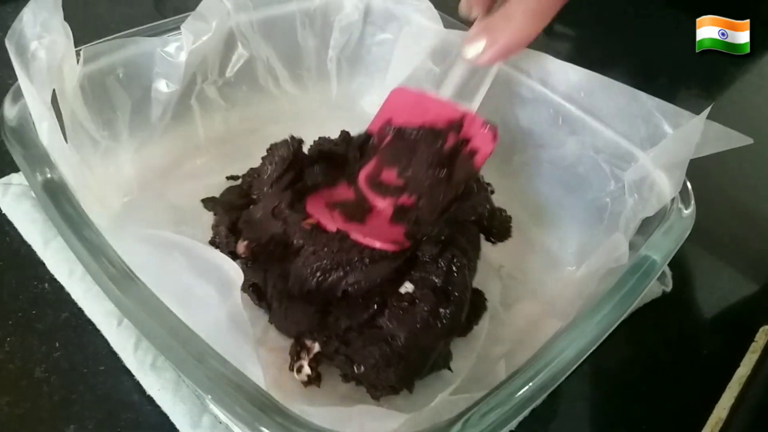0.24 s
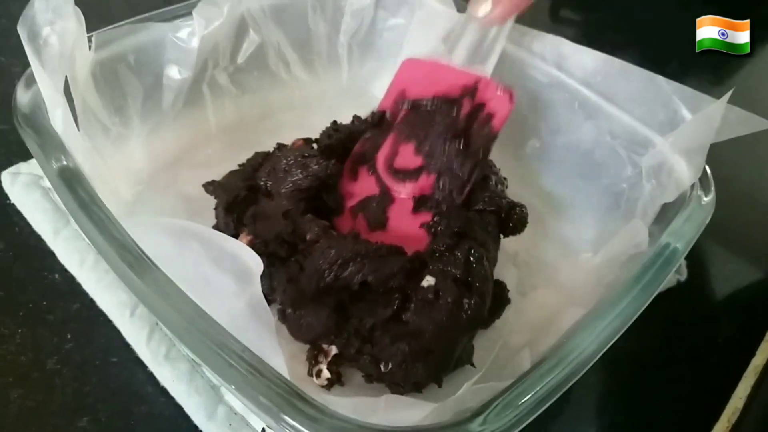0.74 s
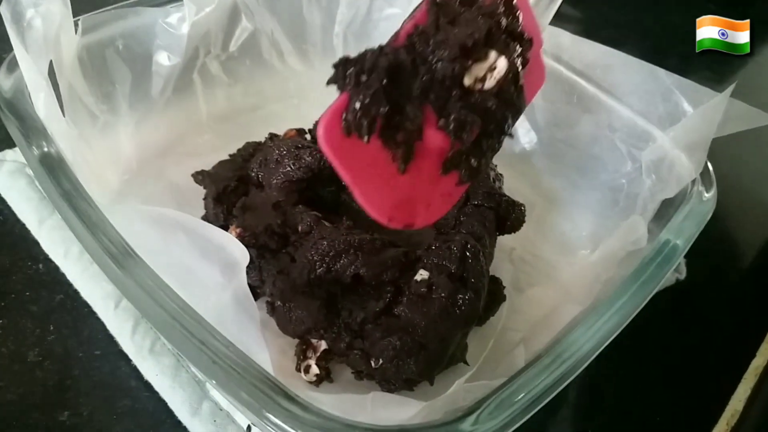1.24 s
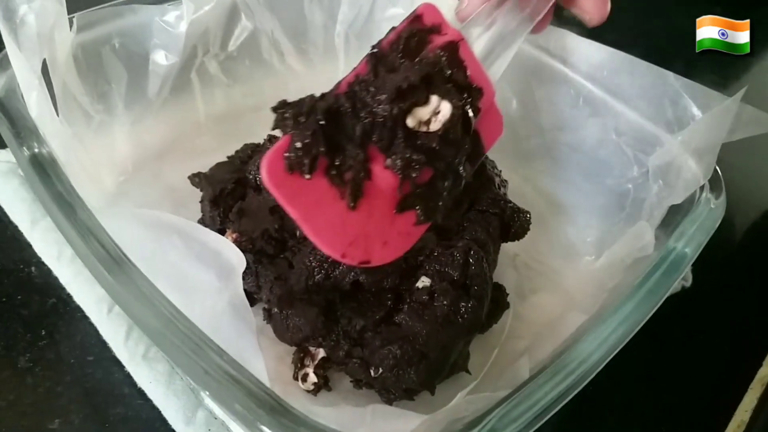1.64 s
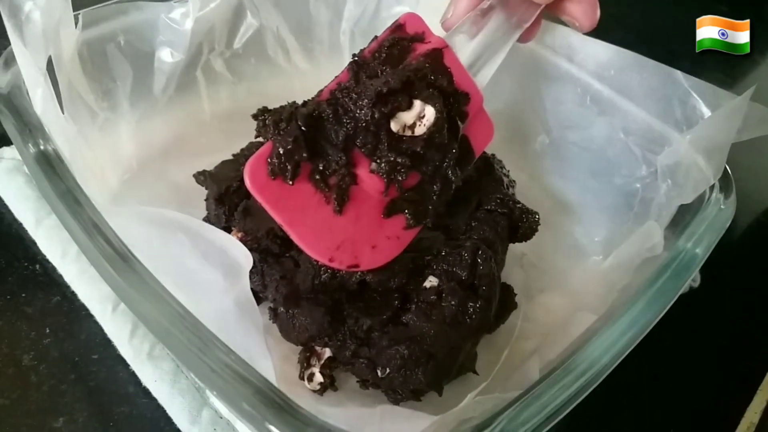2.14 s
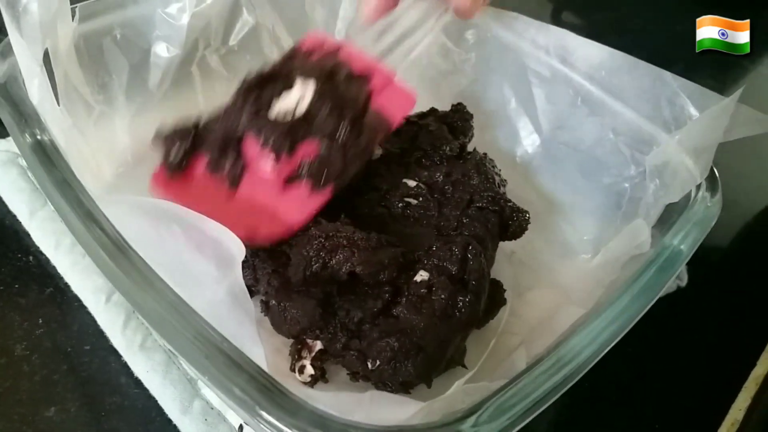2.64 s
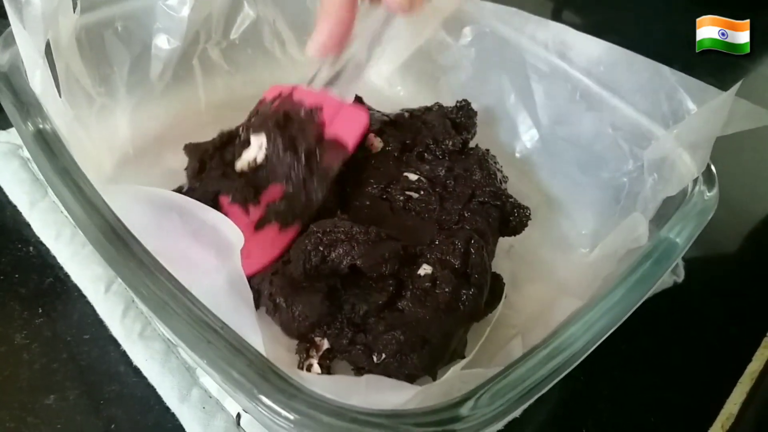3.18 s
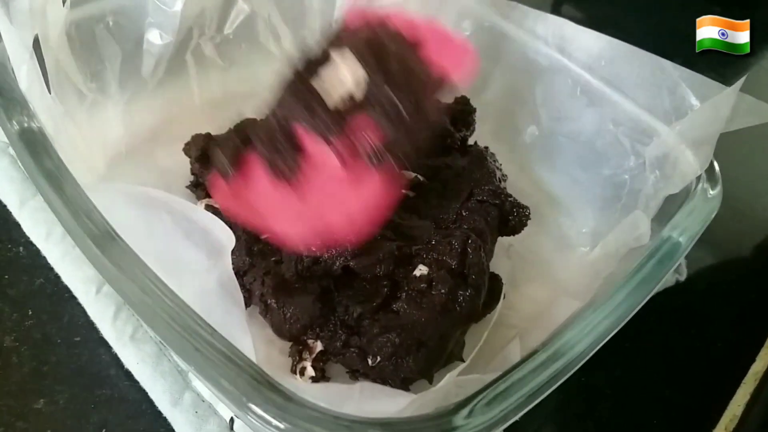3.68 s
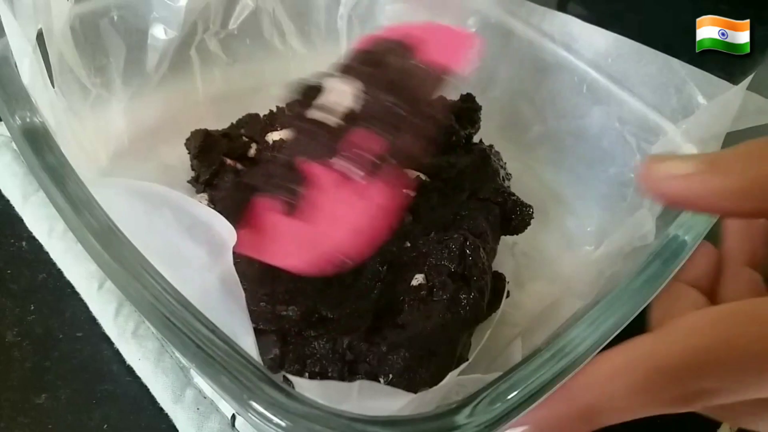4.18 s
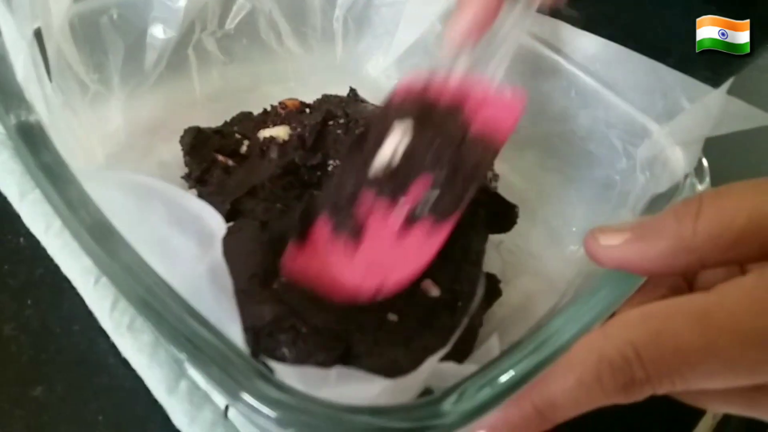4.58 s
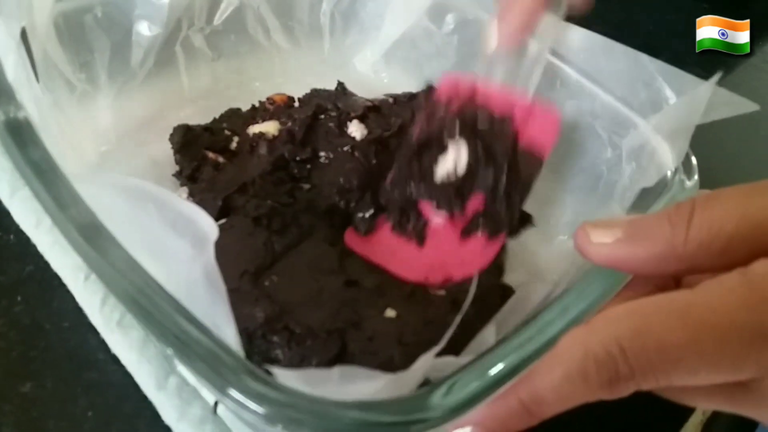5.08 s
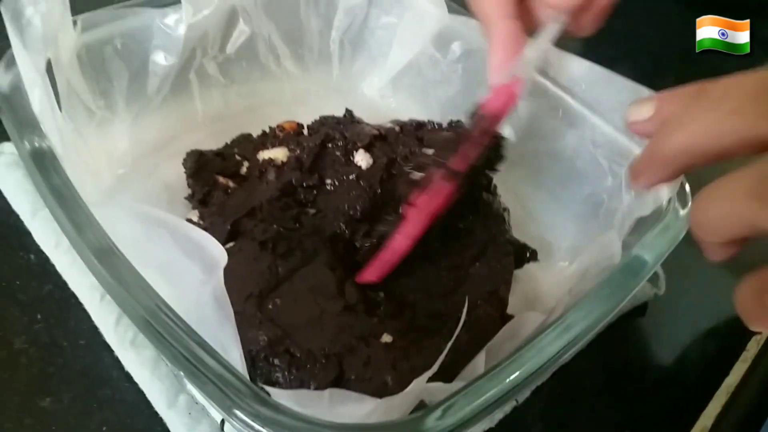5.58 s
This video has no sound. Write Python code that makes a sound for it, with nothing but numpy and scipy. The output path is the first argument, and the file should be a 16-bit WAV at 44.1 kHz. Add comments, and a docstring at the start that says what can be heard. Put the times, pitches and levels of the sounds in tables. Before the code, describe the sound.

Faint sticky smears of thick fudge with tiny high clicks, a hard glass dish knock, then sharp pops and crackles of lining paper.

```python
"""A spatula smears thick fudge with a sticky fizz, in a paper-lined glass dish in a hard-walled kitchen.
Filtered streams of tiny bursts make the smear; sticky threads part in high clicks, and the lining paper
snaps in short pops with noise cracks. Knocks excite the dish's short low modes and ringing glass, and soft
bumps follow. Dry ticks, a low wavering drone and filtered room noise lie under it. One microphone hears
it all, and the paper, dish and fudge sounds carry the echo of the room."""
import sys
import numpy as np
from scipy import signal
from scipy.fft import rfft, irfft, next_fast_len
from scipy.io import wavfile
from scipy.ndimage import uniform_filter1d

SR = 44100
rng = np.random.default_rng(int(sys.argv[2]) if len(sys.argv) > 2 else 0)


def waveform_to_disk(signal):
    """Save audio, clipped to [-1, 1], as 16-bit WAV at the path in sys.argv[1]."""
    frames = np.transpose(np.atleast_2d(signal))
    scaled = np.clip(frames, -1, 1) * 32767
    samples = np.round(scaled).astype(np.int16)
    wavfile.write(sys.argv[1], SR, samples)


N = 256662  # samples
TIME = np.arange(N) / SR  # seconds


# Pushes of the blade through the fudge.
# Each row: start in seconds, length in seconds, drag in dB before the common trim, wet fizz in dB.
STROKES = [(0.107, 0.33, -73, -76.5), (0.417, 0.074, -74, -63), (0.515, 0.16, -79, -66.5),
           (0.851, 0.048, -73, -64), (1.181, .08, -72.5, -80), (2.787, 0.083, -60, -64.5),
           (2.97, 0.089, -61, -76), (3.074, 0.051, -57.5, -61), (3.193, 0.12, -75, -69.5),
           (3.387, 0.14, -72, -72.5), (3.566, 0.23, -73, -78), (3.743, 0.23, -66.5, -69),
           (4.044, .12, -72, -65.5), (4.165, 0.053, -64, -73), (4.42, 0.11, -69.5, -73.5),
           (4.561, 0.075, -66.5, -60.5)]
# Hollows between blade and dish that colour the scraping.
# Each row: centre in Hz, width in Hz, level in dB against the plain slips.
HOLLOWS = [(356, 24, 15), (710, 130, 3), (1325, 130, 2), (2320, 400, 5), (4180, 730, -4)]
# Tone curve of the dragging blade. Each row: frequency in Hz, relative level in dB.
DRAG_TONE = [(150, 7), (400, -11), (900, -2.5), (1600, -4.5), (2500, -4), (3200, -4.5), (4400, -8.5),
             (5600, -10.5), (9000, -24.5)]
# Tone curve of the wet fizz. Each row: frequency in Hz, relative level in dB.
FIZZ_TONE = [(1500, -3), (4000, 1), (7000, -4), (9200, 4), (11500, 2.5), (14000, 5), (16000, -44)]
STROKE_BUILD_SHARE, STROKE_RELEASE_S = 0.59, 0.029


def smearing(drag_db=-1, fizz_db=0, sticking_db=0.83, sticking_hz=35):
    """The blade drags in fine slips, and sticky threads and air pockets burst behind it."""
    drag_level, fizz_level = np.zeros(N), np.zeros(N)
    for start, length, stroke_drag_db, stroke_fizz_db in STROKES:
        effort = push(start, length, STROKE_BUILD_SHARE, STROKE_RELEASE_S)
        drag_level = np.maximum(drag_level, effort * undb(stroke_drag_db + drag_db))
        fizz_level = np.maximum(fizz_level, effort * undb(stroke_fizz_db + fizz_db))
    slips = crackle(30000, spread_db=0.83, flutter_db=2.6, flutter_hz=90)
    hollow_sound = sum(undb(db) * resonate(slips, hz, width) for hz, width, db in HOLLOWS)
    drag = colour(slips + hollow_sound, DRAG_TONE) * drag_level
    bursts = crackle(9000, spread_db=3.1, flutter_db=2.0, flutter_hz=140)
    fizz = colour(bursts, FIZZ_TONE) * fizz_level
    sticking = undb(sticking_db * walk(sticking_hz))
    return room((drag + fizz) * sticking, wet_db=-6)


# The thickest sticky threads parting. Each row: start in seconds, level in dB, pitch in Hz.
THREADS = [(.161, -46, 12500), (.222, -47, 11870), (.4465, -29, 12900), (.551, -40, 12100),
           (.6435, -46.5, 11000), (3.052, -50, 8900), (3.457, -50, 10000), (4.031, -47, 10200),
           (4.128, -39.5, 11500), (4.137, -39, 12500), (4.579, -37, 11700), (4.629, -44, 13000)]


def threads(cycles=0.82, length_s=.003, count=3):
    """Each thread of fudge lets go in a few tiny, high clicks."""
    out, t = np.zeros(N), TIME[:SR // 100]
    for s, db, hz in list(THREADS) + fine_threads():
        for k, (when, detune) in enumerate(rng.random((count, 2))):
            delay = (k > 0) * when * length_s  # the first click is on time
            click = pop(t, hz * 2 ** (0.32 * (detune - .5)), cycles)
            add(out, s + delay, undb(db - 4.7 * k) * click)
    return room(out, wet_db=-14)


# Finer threads part at random while the blade moves; the level spread goes both ways
FINE_THREADS_PER_S, FINE_THREAD_DB, FINE_THREAD_SPREAD_DB, FINE_THREAD_HZ = 12, -57.5, 6.5, 10000


def fine_threads():
    """Fine threads part only during strokes: rows of seconds, dB, Hz."""
    rows = []
    for when, size, detune in rng.random((int(FINE_THREADS_PER_S * N / SR), 3)):
        s = when * N / SR
        if any(0 < s - start < length for start, length, _, _ in STROKES):
            db = FINE_THREAD_DB + FINE_THREAD_SPREAD_DB * (2 * size - 1)
            rows.append((s, db, FINE_THREAD_HZ * 2 ** (.5 * (detune - .5))))
    return rows


# Snaps of the lining paper. Each row: start in seconds, level in dB, pitch in Hz, crumple length in ms,
# crisp treble in dB and low thud in dB, both against the snap's level (the treble before crack_db).
SNAPS = [(0.4036, -48.5, 2750, 1.4, -3, -11), (0.434, -49, 3550, 5.9, -14, -1),
         (0.4467, -35.5, 3520, 2.3, 1, -33), (.4475, -38.5, 950, 5.54, -7, 1.5),
         (.569, -48, 1270, 4.2, -4, 5), (.641, -44.5, 2020, 2.5, 3.5, -11),
         (.750, -50.5, 1220, 2.2, -16, -17), (1.214, -56, 2550, 4.5, 10.5, -3),
         (1.266, -56.5, 2440, 4.2, 4.5, -25), (1.914, -53, 1870, 16.7, -15, 0.5),
         (2.861, -47.5, 1226, 5.4, -1, 4), (3.131, -43.5, 1340, 6.3, 1.5, 4.5),
         (3.306, -57.5, 2860, 3, 7.5, 2), (4.116, -48, 3040, 1, -14, -10),
         (4.184, -38.5, 2130, 3.2, -16, -10.5), (4.519, -50.5, 2080, 5, -5, -22),
         (4.854, -36.5, 1210, 3.2, -4, 1.5), (4.861, -32.5, 760, 12, -15, -33),
         (4.865, -32, 2210, 5, -5, -5), (4.951, -39, 1276, 2.6, 1, -1), (4.9633, -39, 1480, 6.9, 2.5, -0.5),
         (5.0185, -35, 1880, 4, -3, -17), (5.021, -32, 1830, 5, -8, -11),
         (5.036, -28, 1830, 8.5, -5.5, -20), (5.061, -14, 1310, 1.2, -9.5, -44),
         (5.1448, -19.5, 1890, 2.74, -4, -25), (5.156, -31.5, 1460, 3.5, -0.5, -34),
         (5.1595, -28.5, 787, 1.94, -27, 0), (5.207, -41.5, 1760, 9, 0, -3),
         (5.2156, -39, 854, 8.37, 0, -15), (5.275, -35, 2260, 3.7, -30, -6),
         (5.331, -50.5, 1400, 7.5, 8, -12), (5.369, -46, 2163, 5.1, -13, -31),
         (5.3732, -33, 2260, 4, -16, -39), (5.3831, -33, 1790, 2.8, -8, -14.5),
         (5.4423, -32, 1530, 1.34, -17, -37), (5.4717, -35, 3450, 1.3, -11, -22),
         (5.518, -41.5, 1820, 0.56, -28, -14), (5.529, -40.5, 1380, 1.2, -10, -32),
         (5.7213, -52.5, 1560, 4.4, -3, -3), (5.735, -52.5, 1410, 2.9, 10, 6)]
# Tone curve of a hard, crisp crack. Each row: frequency in Hz, relative level in dB.
CRISP_TONE = [(600, 3), (2000, 1), (3500, 9), (5000, -1.5), (6800, -9), (8500, 0), (11000, -2.5),
              (14000, -21)]


def snaps(cycles=0.79, crack_s=.0015, crack_db=-7, thud_hz=480, thud_cycles=0.22, follow_db=-7,
          low_cut_hz=110, count=8):
    """Each buckle of the paper is a pop and a crack, trailed by smaller folds of scattered pitch."""
    out, t = np.zeros(N), TIME[:SR // 20]
    for s, db, hz, length_ms, crisp_db, thud_db in SNAPS:
        length = length_ms / 1000
        sound = pop(t, hz, cycles) + undb(thud_db) * pop(t, thud_hz, thud_cycles)
        # a short buckle is nearly one clean pop; a longer crumple folds more strongly after it
        crumple = min(length / 0.0048, 1) ** 2
        for when, detune, size in rng.random((count, 3)):
            fold = pop(t, hz * 2 ** (1.7 * (detune - .5)), cycles)
            add(sound, when * length, undb(follow_db) * (.5 + size) * crumple * fold)
        crack_fade = np.exp(-t / (crack_s + 0.37 * length))
        crack = colour(rng.standard_normal(len(t)), CRISP_TONE) * crack_fade
        add(out, s, undb(db) * (sound + undb(crisp_db + crack_db) * crack))
    # the snaps carry little deep bass
    low_cut = signal.butter(2, low_cut_hz, "high", fs=SR, output="sos")
    return room(signal.sosfilt(low_cut, out), wet_db=-0.5)


# The hand grips and shifts the lining paper. Each row: start in seconds, length in seconds, level in dB.
GRIPS = [(4.848, 0.024, -53), (5.001, 0.07, -51), (5.108, 0.12, -58.5), (5.344, 0.13, -59.5),
         (5.71, .03, -66)]
# Tone curve of the creasing paper. Each row: frequency in Hz, relative level in dB.
PAPER_TONE = [(200, -37), (700, 3), (1500, 2), (3500, 2.5), (6500, -13), (9500, -3), (14000, -3.5)]
GRIP_BUILD_SHARE, GRIP_RELEASE_S = 0.25, 0.031


def rustle(spread_db=4):
    """Fine creases crackle between the big snaps while the hand holds the paper."""
    creases = colour(crackle(2200, spread_db, flutter_db=4.1, flutter_hz=110), PAPER_TONE)
    grip = sum(undb(db) * push(start, length, GRIP_BUILD_SHARE, GRIP_RELEASE_S)
               for start, length, db in GRIPS)
    return room(creases * grip, wet_db=-1)


# Knocks and touches on the dish; the faint row 12 ms after the first knock is that knock's echo off a near
# wall. # Each row: start in seconds, relative level in dB, contact brightness in Hz, glass ring in dB against
# that level.
KNOCKS = [(2.2347, 4.5, 2360, -7.5), (2.2465, -14, 1980, -23), (2.2872, -15, 2800, -20),
          (2.2888, -0.5, 1690, -12), (2.3145, -6, 2180, -26), (2.3264, -4.5, 1120, -11.5),
          (2.384, -9.5, 1450, -40), (2.464, -28, 5000, -1), (3.57, -42, 500, 5)]
# The dish on its counter. Each row: mode in Hz, width in Hz, relative level in dB.
BODY = [(214, 145, -15.5), (346, 56, -4.5), (395, 57, -3), (640, 180, 0.5), (736, 40, 6.5), (772, 42, 2.5),
        (853.5, 27, 6.5), (902, 40, 4.5), (1240, 194, -3.5), (1363, 190, -0.5), (1730, 370, -5)]
# Ringing of the glass. Each row: mode in Hz, relative level in dB, time to fall 60 dB in seconds.
GLASS = [(784, -4, 1), (820, -12, 0.74), (4486, -11, 0.6), (4515, -10.5, 0.28), (7470, -7.5, 0.093),
         (7540, -18, 0.24), (8500, -9.5, 0.13), (10040, -17, .24), (11670, -9, 0.13), (12060, -15, .26)]


def knock(body_db=10, glass_db=-38, click_db=-22, crack_db=-44, crack_s=0.0011):
    """The dish is knocked and rattles: short low modes fill the room while the glass rings on."""
    blows, strikes, t = np.zeros(N), np.zeros(N), TIME[:SR]
    for s, db, hz, ring_db in KNOCKS:
        contact = t * np.exp(-2 * np.pi * hz * t)  # softer contact, longer push
        add(blows, s, undb(db) * contact / contact.sum())
        add(strikes, s, undb([db + ring_db]))  # a single-sample impulse
    body = np.zeros(N)
    for k, (hz, width, db) in enumerate(BODY):
        body += (-1) ** k * undb(db) * resonate(blows, hz, width)
    ring = sum(undb(db - 60 * t / t60) * np.sin(2 * np.pi * hz * t) for hz, db, t60 in GLASS)
    # the hard contact cracks, and the rim chatters faintly after it
    crack_fade = np.exp(-t / crack_s) + undb(-20) * np.exp(-t / 0.13)
    crack = colour(rng.standard_normal(len(t)), CRISP_TONE) * crack_fade
    glass_response = undb(glass_db) * ring + undb(crack_db) * crack
    glass = signal.fftconvolve(strikes, glass_response)[:N]
    click = undb(click_db) * resonate(blows, 1500, 3300)
    return room(undb(body_db) * (body + click), wet_db=6.5) + room(glass, wet_db=2.0)


# Soft bumps. Each row: start in seconds, level in dB, pitch in Hz.
BUMPS = [(3.49, -49, 390), (3.499, -38.5, 247), (3.514, -53, 522), (3.528, -59, 870), (3.533, -42.5, 314),
         (3.554, -61, 250)]


def bumps(cycles=0.99, tap_db=-14, tap_hz=560):
    """Dull, padded bumps as the spatula comes away: a low pop with a fainter tap on it."""
    out, t = np.zeros(N), TIME[:SR // 8]
    for s, db, hz in BUMPS:
        tap = undb(tap_db) * pop(t, tap_hz, 0.42)
        add(out, s, undb(db) * (pop(t, hz, cycles) + tap))
    return room(out, wet_db=4)


# Runs of faint, evenly spaced dry ticks.
# Each row: start in seconds, length in seconds, first tick in dB, last tick in dB, before random scatter.
TICK_RUNS = [(0.6043, .185, -50, -37.5), (4.301, .185, -41, -52.5), (5.534, .12, -40.5, -47)]
TICK_GAP_S = .0335


def ticks(hz=2500, cycles=0.25, edge_hz=4900, scatter_db=-1.0):
    """Runs of tiny low-passed clicks with no echo; each run grows or fades."""
    out, t = np.zeros(N), TIME[:SR // 200]
    for start, length, first_db, last_db in TICK_RUNS:
        times = start + np.arange(0, length, TICK_GAP_S)
        for s, db in zip(times, np.linspace(first_db, last_db, len(times))):
            level = undb(db + scatter_db * rng.standard_normal())
            add(out, s, level * pop(t, hz, cycles))
    return signal.sosfilt(signal.butter(8, edge_hz, fs=SR, output="sos"), out)


# Swells of a faint low drone.
# Each row: loudest moment in seconds, half width in seconds, pitch at that moment in Hz, level in dB.
SWELLS = [(0.381, 0.11, 341.4, -71), (.8, 0.17, 345, -68.5), (1.76, 0.12, 322.6, -71.5),
          (4.18, 0.095, 368, -61), (4.75, 0.14, 368.5, -72.5)]
SWELL_SAG_HZ_PER_S = 73


def hum(width_hz=130):
    """A faint low drone: a narrow, wavering band that sinks in pitch through each swell."""
    out = np.zeros(N)
    for s, width, hz, db in SWELLS:
        age = TIME - s
        phase = 2 * np.pi * np.cumsum(hz - SWELL_SAG_HZ_PER_S * age) / SR
        band = unit(walk(width_hz) * np.sin(phase) + walk(width_hz) * np.cos(phase))
        out += undb(db) * band / (1 + (age / width) ** 2)
    return out


# Spectrum of the quiet kitchen. Each row: frequency in Hz, relative level in dB.
KITCHEN_TONE = [(20, -4), (38, -13), (65, 1.5), (100, 1), (140, -4.5), (300, -3.5), (550, -10.5),
                (1000, -15.5), (2600, -15.5), (3100, -20), (4500, -19.5), (5500, -29), (7500, -31.5),
                (9000, -26.5), (14000, -25)]
KITCHEN_DB = -67.5


def kitchen():
    """Room noise: even hiss over a soft rumble, from filtered white noise."""
    return undb(KITCHEN_DB) * colour(rng.standard_normal(N), KITCHEN_TONE)


# The room's echo. Each row: band centre in Hz, time to fall 60 dB in seconds,
# echo energy against the direct sound in dB before each source's own wet_db.
ROOM = [(149, 0.85, -1.5), (553, 0.68, -4), (760, 0.78, -1.5), (1230, 0.53, -4.5), (2800, 0.55, -6.5),
        (5900, 0.58, -4.5), (12900, 0.38, -8)]


def room(x, wet_db, gap_s=0.0013, early_db=-2, early_s=0.015):
    """Direct sound, a cluster of near reflections, then the echo of hard walls, whose treble dies first."""
    t = TIME[:SR]
    hz, t60, db = np.transpose(ROOM)
    freqs = np.fft.rfftfreq(len(t), 1 / SR)
    noise = rfft(rng.standard_normal(len(t)))
    arrival = np.clip(t / gap_s - .5, 0, 1) * (1 + undb(early_db) * np.exp(-t / early_s))
    echo = np.zeros(len(t))
    # each identity row picks one band, cross-fading into its neighbours
    for share, decay, band_db in zip(np.eye(len(hz)), t60, db):
        band = irfft(noise * np.interp(np.log(freqs + 1), np.log(hz), share), len(t))
        fade = np.exp(-np.log(1000) * t / decay) * arrival
        echo += undb(band_db) * band * fade / np.sqrt(np.sum(fade ** 2))
    return x + undb(wet_db) * signal.fftconvolve(x, echo)[:N]


def push(start, length, build_share, release_s):
    """Effort of one movement: builds up smoothly over a share of its length, holds, then dies away."""
    age = TIME - start
    build = np.sin(np.pi / 2 * np.clip(age / (build_share * length), 0, 1))
    return build * np.exp(-np.maximum(age - length, 0) / release_s)


def crackle(rate, spread_db, flutter_db, flutter_hz):
    """Tiny bursts, ringing briefly at pitches from low to high; their level flutters in clusters."""
    pitches = np.geomspace(250, 13500, 12)
    bursts = sum(resonate(grains(rate / len(pitches), spread_db), hz, 0.66 * hz) for hz in pitches)
    return bursts * undb(flutter_db * walk(flutter_hz))


def grains(rate, spread_db):
    """Tiny random clicks of very unequal size, at a mean rate per second."""
    chance, out = rng.random(N) * SR / rate, np.zeros(N)
    at = np.flatnonzero(chance < 1)
    size_db = spread_db * np.minimum(-np.log(chance[at]), 4)
    out[at] = (-1.) ** at * undb(size_db)
    return out


def pop(t, hz, cycles):
    """A flexing patch: a sine whose envelope peaks at 1 after some cycles, then dies away."""
    age = t * hz / cycles
    return age * np.exp(1 - age) * np.sin(2 * np.pi * hz * t)


def resonate(x, hz, width):
    """One resonance, gain 1 at its centre."""
    return signal.lfilter(*signal.iirpeak(min(hz, SR * .45), hz / width, fs=SR), x)


def walk(rate):
    """Smooth random wandering of rms near 1: random steps at a rate per second, averaged over a step."""
    k = max(int(SR / rate), 1)
    steps = np.repeat(rng.standard_normal(N // k + 1), k)
    return unit(uniform_filter1d(steps, k))[:N]


def colour(x, points):
    """Filter a sound through a tone curve of (Hz, dB) points and scale to rms 1."""
    hz, db = np.transpose(points)
    size = next_fast_len(len(x), True)
    freqs = np.maximum(np.fft.rfftfreq(size, 1 / SR), 1)
    gain = undb(np.interp(np.log(freqs), np.log(hz), db))
    return unit(irfft(rfft(x, size) * gain, size)[:len(x)])


def undb(db):
    """Decibels to gain."""
    return 10 ** (np.asarray(db) / 20)


def unit(x):
    """Scale to rms 1."""
    return x / np.sqrt(np.mean(x ** 2) + 1e-30)


def add(track, s, sound):
    """Mix a sound into a track at a time in seconds."""
    start = max(int(s * SR), 0)
    part = sound[:len(track) - start]
    track[start:start + len(part)] += part


def scene():
    """All sources at one microphone."""
    fudge = smearing() + threads()
    paper = snaps() + rustle()
    dish = knock() + bumps()
    background = ticks() + hum() + kitchen()
    return (fudge + paper + dish + background)[None]


TOP_HZ = 14300


def record(dry):
    """The recorder thins the deep bass and cuts the top."""
    thin = signal.sosfilt(signal.butter(1, 60, "high", fs=SR, output="sos"), dry)
    return signal.sosfilt(signal.ellip(8, .2, 70, TOP_HZ, fs=SR, output="sos"), thin)


dry = scene()
out = record(dry)
waveform_to_disk(out)
```